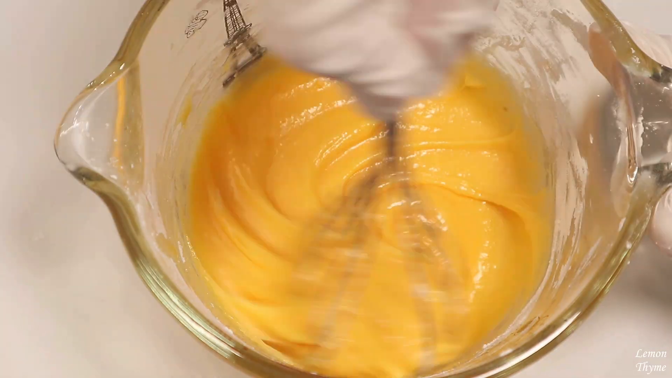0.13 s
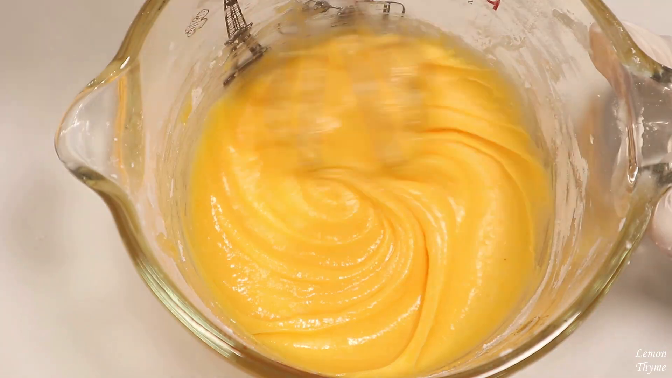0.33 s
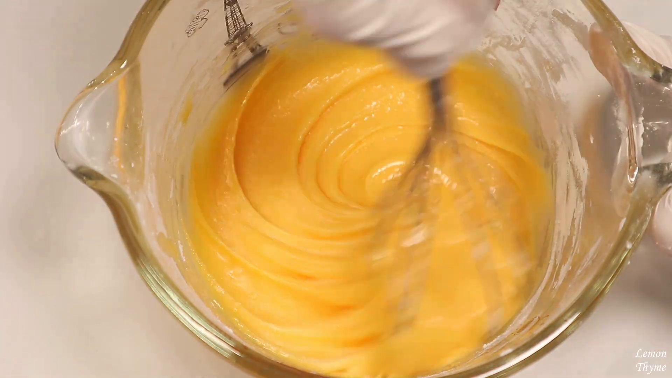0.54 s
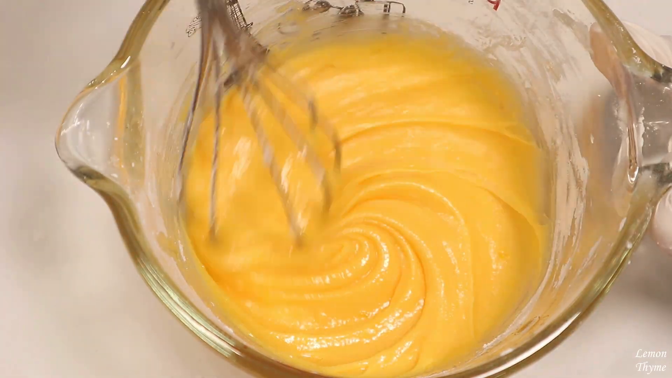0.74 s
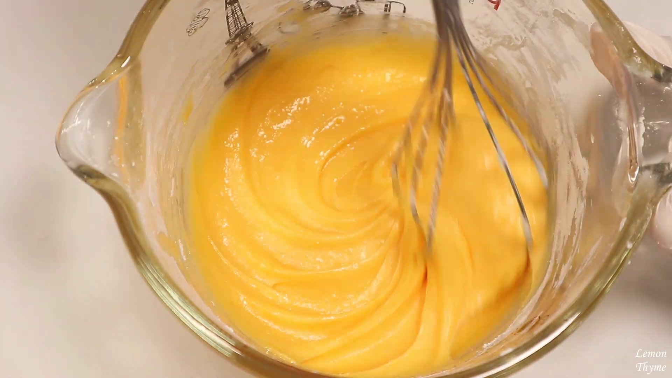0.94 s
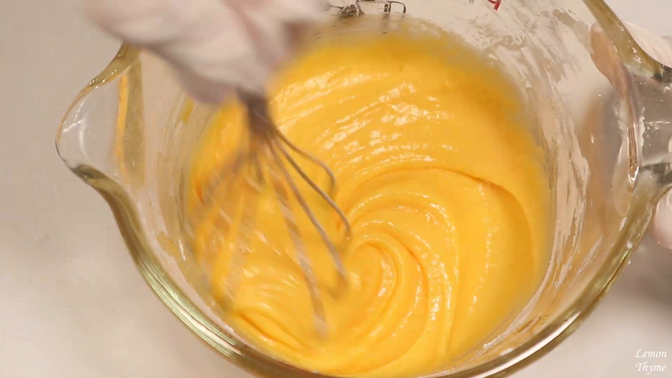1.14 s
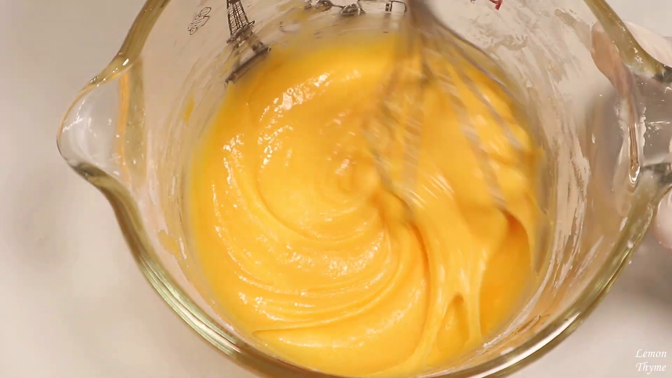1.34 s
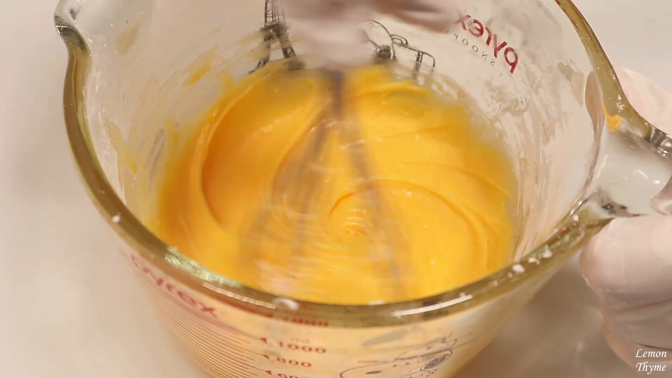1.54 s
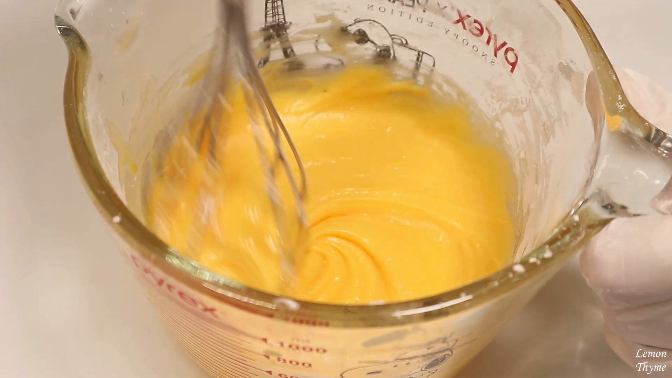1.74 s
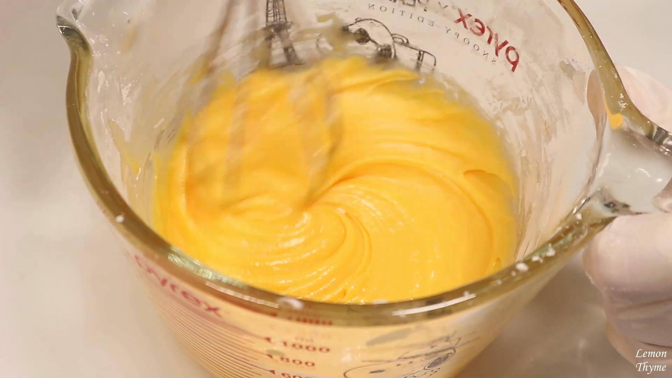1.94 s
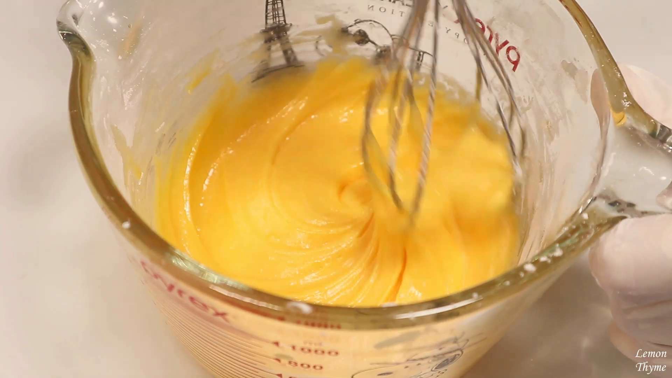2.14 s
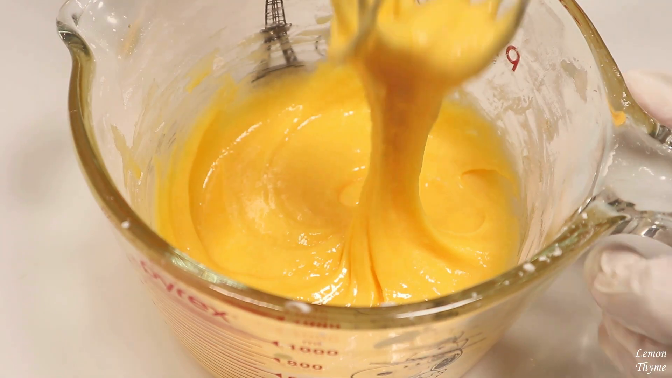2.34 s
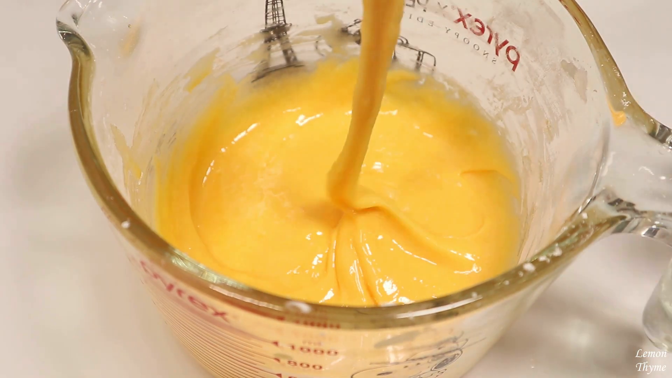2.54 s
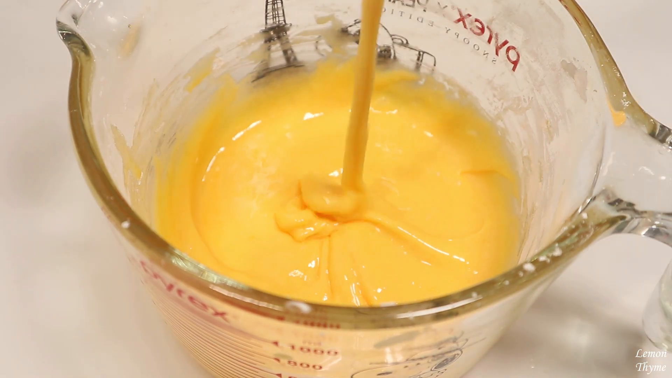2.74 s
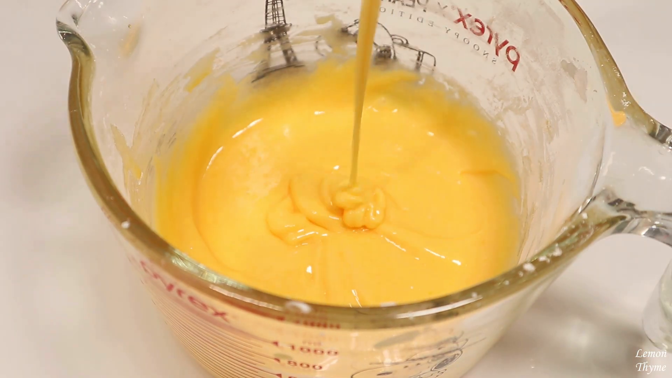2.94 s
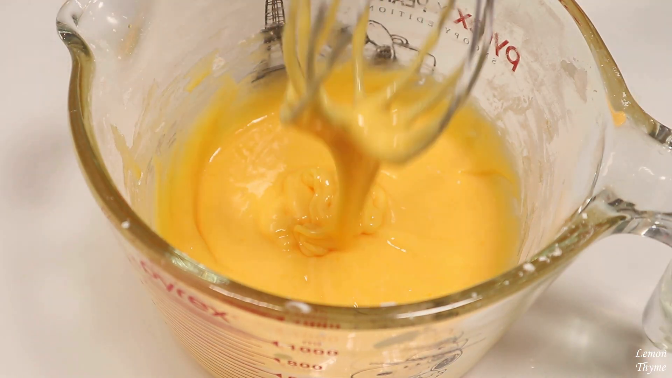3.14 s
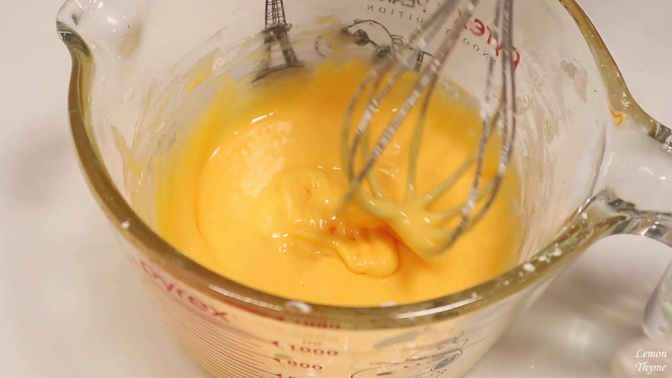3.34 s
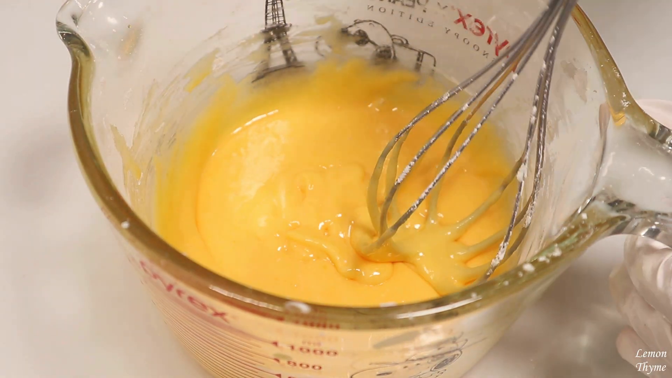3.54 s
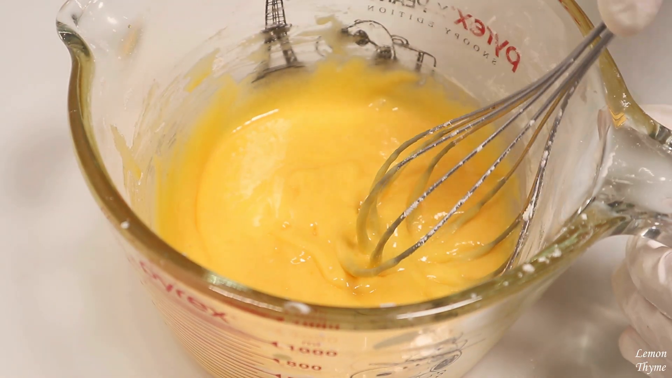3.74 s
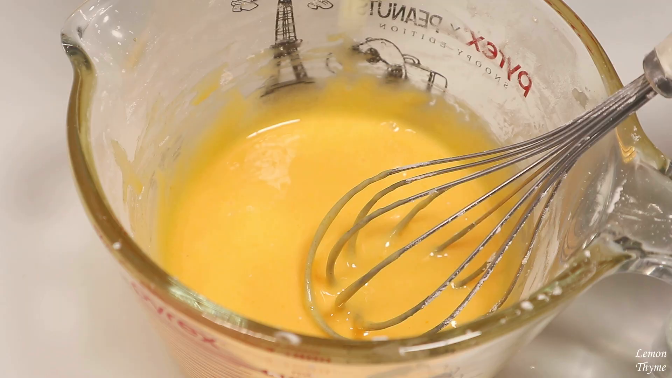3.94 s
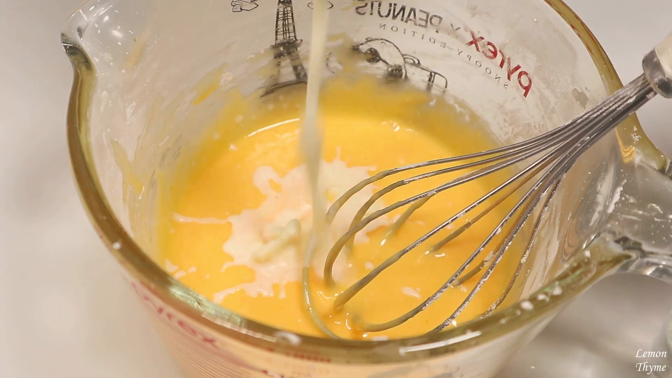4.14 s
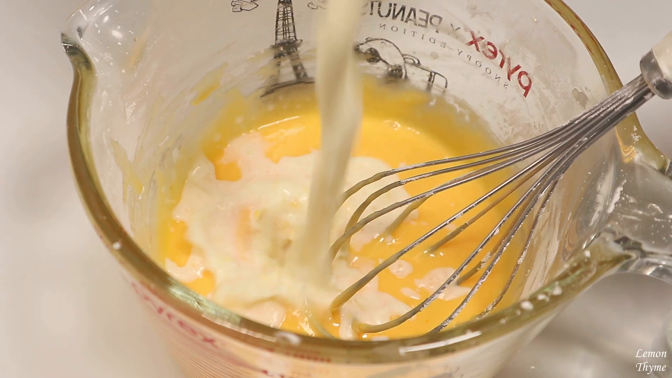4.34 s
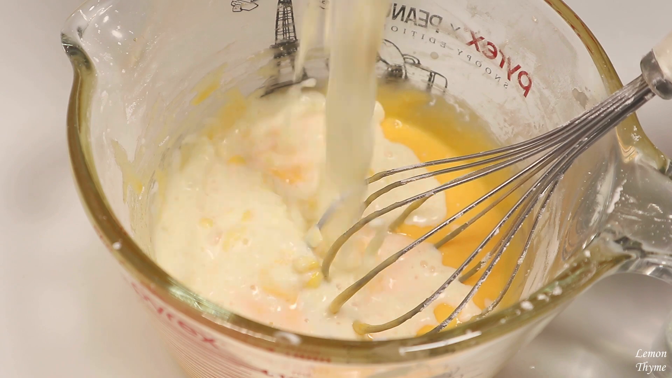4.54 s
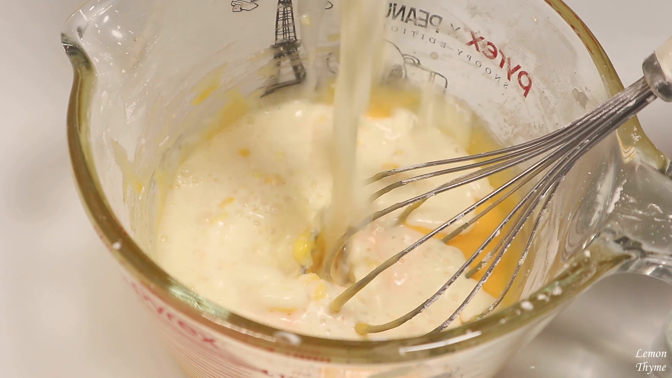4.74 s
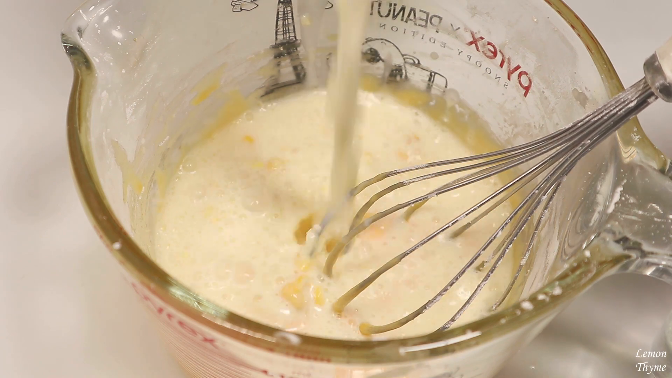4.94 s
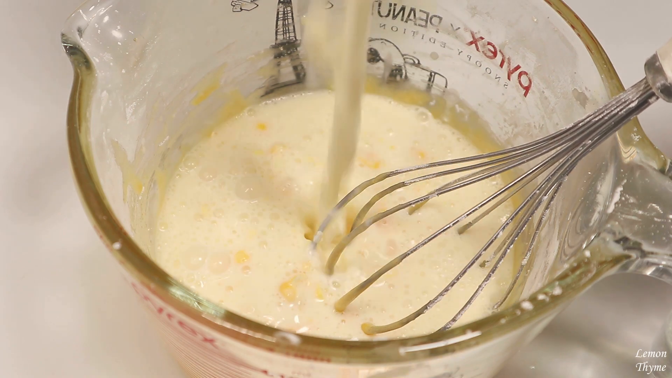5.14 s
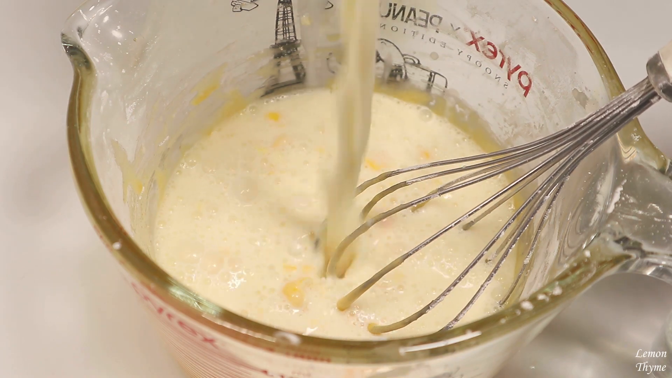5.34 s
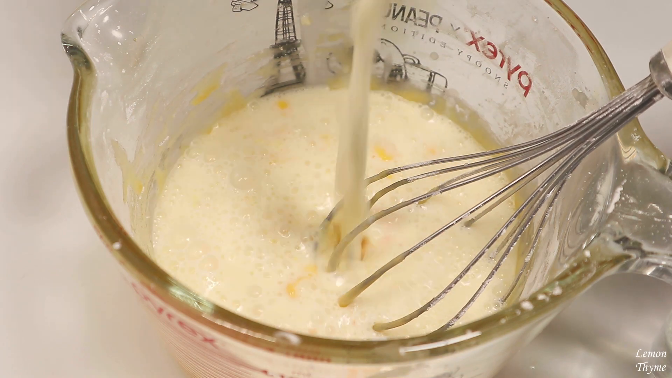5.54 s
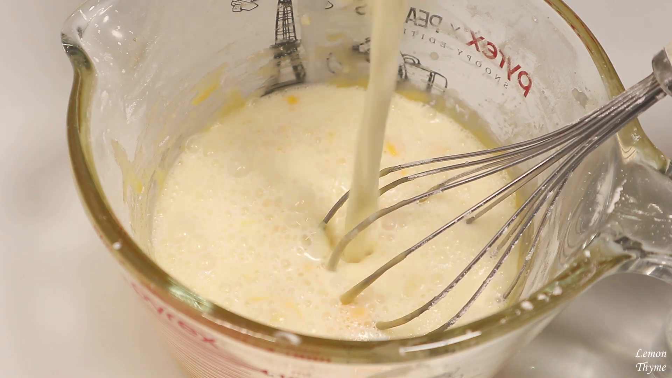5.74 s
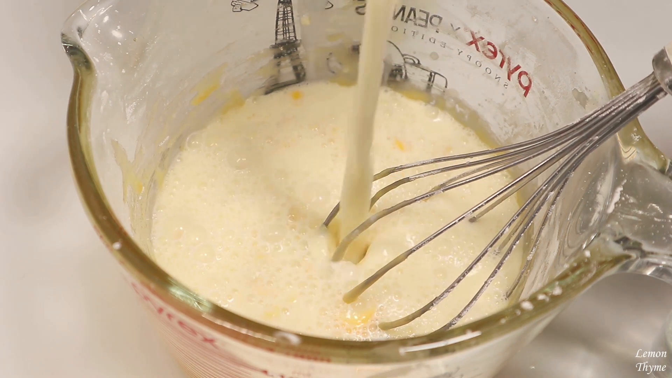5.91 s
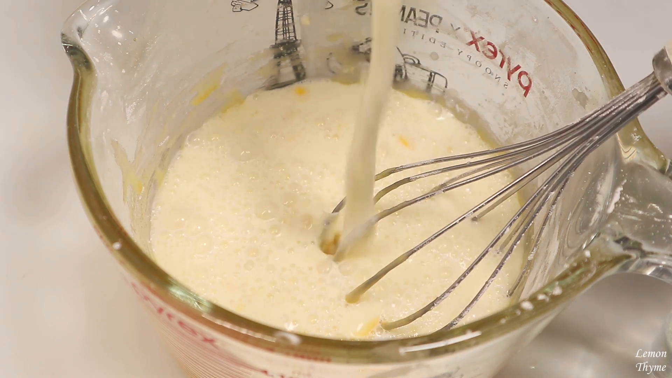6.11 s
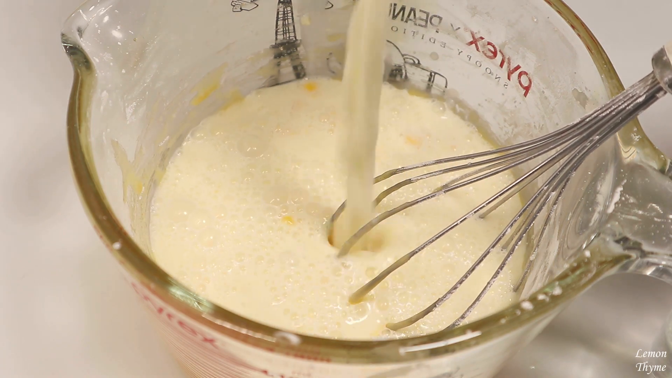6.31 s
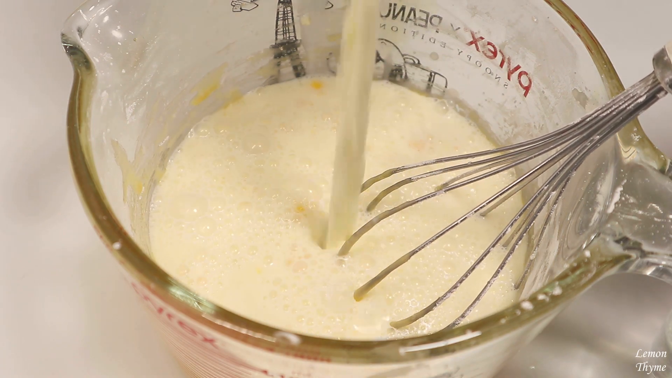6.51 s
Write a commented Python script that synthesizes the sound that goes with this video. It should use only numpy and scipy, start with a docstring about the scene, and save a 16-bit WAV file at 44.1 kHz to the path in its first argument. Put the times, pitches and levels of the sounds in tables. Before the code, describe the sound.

For two seconds thin wires scrape and rattle quickly on glass through sticky yolk, the jug bumping the counter. A tap or two, a tiny drip and faint wire touches fill a quiet gap. A stream of milk then bursts in, much louder, splattering and crackling brightly, with low hollow gulps, before foam mutes it. Close microphones, small dry kitchen.

```python
"""Whisking yolks, then pouring milk

A wire whisk beats thick egg yolks in a glass jug: wires scrape and tick on the glass, yolk squelches and
the jug thumps on the counter. The whisk is lifted with a clink, drips and is laid back. Milk is poured in:
plops, splats, gulping bubbles and a fizz that softens as foam builds. Close stereo, in a quiet kitchen.
Blows are shaped noise, glass and counter are decaying modes, the fizz is a swarm of tiny ringing bubbles."""
import sys
import numpy as np
from scipy import signal
from scipy.fft import rfft, irfft
from scipy.io import wavfile
from scipy.ndimage import uniform_filter1d

SR = 44100
rng = np.random.default_rng(int(sys.argv[2]) if len(sys.argv) > 2 else 0)


def dump(signal):
    """Clip the signal to [-1, 1] and save it as 16-bit WAV at the path in sys.argv[1]."""
    limited = np.clip(np.atleast_2d(signal).T, -1, 1)
    pcm = np.round(limited * 32767).astype(np.int16)
    wavfile.write(sys.argv[1], SR, pcm)


N = 294147
TIME = np.arange(N) / SR

# All event levels are relative: the functions trim them.
# Sweeps of the whisk along the wall. Each row: start in s, length in s, bite in dB, treble share in dB,
# push on the counter in dB.
STROKES = [(0.095, .01, -26.5, -11, -48), (0.138, 0.067, -24, -16.5, -29), (0.292, .04, -22, -14, -32.5),
           (0.354, 0.046, -32.5, -5.5, -43), (0.4676, 0.011, -17, -21, -37), (0.4997, 0.061, -25, -9, -50),
           (0.658, .01, -26.5, -8.5, -34.5), (0.6749, 0.0073, -23, 0, -42),
           (0.8315, 0.024, -26.5, -22, -35.5), (0.9068, .04, -26.5, -9, -29.5), (0.9742, .06, -31, -4, -34),
           (1.176, 0.053, -27, -14.5, -46), (1.361, 0.029, -30.5, -6, -40),
           (1.638, 0.033, -28.5, -20, -24.5), (1.7992, 0.029, -30, -11, -66),
           (1.9047, 0.0099, -26, -8, -23.5), (2.0208, .04, -25.5, -14, -42),
           (2.1253, 0.018, -21, -7.5, -21.5)]
# Ring of the jug's glass. Each row: frequency in Hz, level in dB, undamped t60 in s.
GLASS_MODES = [(1044, -14.5, 0.34), (1943, -4.5, 0.048), (3135, -2.5, 0.25), (4680, -1, 0.037),
               (4800, 4, 0.045), (5060, -24, 0.057), (6010, -1, 0.049), (8170, -8.5, .06),
               (8720, -4.5, 0.051), (9600, -19, .05), (12000, -5, 0.055)]
# The lifted whisk taps the free wall, which rings on. Each row: start in s, ring in dB, crack in dB.
CLINK_EVENTS = [(2.105, -49, -25), (2.418, -38, -25.5)]
# Soft drops landing on bare yolk. Each row: start in s, level in dB.
PLOP_EVENTS = [(2.838, -47), (4.126, -26.5), (4.148, -26), (4.175, -26), (4.279, -15), (4.349, -24)]
# Loudest slaps of milk. Each row: start in s, level in dB, low share in dB, treble share in dB.
LOUD_SLAPS = [(4.2393, -28, -12.5, 4), (4.2778, -11.5, -7, -6.5), (4.3458, -15, -22, -10),
              (4.35, -12.5, -33, -4), (4.436, -2.5, -22, -9.5), (4.47, -10, -7, -7),
              (4.5853, -7.5, -29, -20), (4.6004, -7.5, -20, -10), (4.689, -8, -25, -8),
              (4.7197, -13.5, -39, -3), (4.831, -10, -13.5, -20), (4.9016, -8.5, -11.5, -11),
              (4.9142, -13.5, -18, -30), (4.9574, -19.5, -3, -22), (5.069, -16.5, -15, -6),
              (5.1656, -6.5, -16.5, -2.5), (5.175, -13.5, -11, -20), (5.253, -16, -25, -14),
              (5.3817, -22.5, 0, -18), (5.5345, -20.5, -30, -6), (5.8112, -13, -29, 0.5),
              (5.876, -16.5, -10.5, -1), (5.9165, -25, -3, 3.5), (6.2882, -24.5, -9.5, -6),
              (6.373, -24, -10, -18), (6.451, -23.5, -4.5, -18), (6.4733, -17, -26, -29)]
# The stream of milk. Each row: time in s, fizz in dB, gurgle in dB.
POUR = [(4.2, -50.5, -52), (4.32, -35, -49.5), (4.46, -29.5, -35), (4.52, -33.5, -43), (4.588, -20.5, -36),
        (4.7, -33, -40), (5.0, -29, -40), (5.2, -29, -39), (5.47, -40.5, -41), (5.7, -35.5, -42.5),
        (5.95, -44.5, -42.5), (6.3, -41.5, -45.5), (6.46, -41, -36.5), (6.67, -45.5, -45.5)]

BEATING_ENDS_S = (2.146, 2.383)
FOAM_BUILDS_S = (4.22, 6.05)


def undb(db):
    """Decibels to gain."""
    return 10 ** (np.asarray(db) / 20)


def unit(x):
    """Scale to rms 1."""
    return x / np.sqrt(np.mean(x ** 2) + 1e-20)


def ramp(span_s, s=TIME):
    """Rise from 0 to 1 over a span of time."""
    return np.interp(s, span_s, [0, 1])


def curves(table):
    """Gain over time for each dB column of a table."""
    s, *columns = np.transpose(table)
    return [undb(np.interp(TIME, s, column)) for column in columns]


def add(track, s, sound):
    """Mix a sound into a track at a time."""
    start = max(int(s * SR), 0)
    track[start:start + len(sound)] += sound[:max(N - start, 0)]


def band(x, lo_hz, hi_hz):
    """Band-pass, its upper edge held below Nyquist."""
    sos = signal.butter(2, [lo_hz, min(hi_hz, .45 * SR)], "band", fs=SR, output="sos")
    return signal.sosfilt(sos, x)


def through(x, response):
    """Pass sound through a response scaled to unit energy."""
    return signal.oaconvolve(x, response / np.linalg.norm(response))[:len(x)]


def colour(x, spectrum, size=4096):
    """Minimum-phase filter through (Hz, dB) points, with unit energy."""
    hz, db = np.transpose(spectrum)
    log_hz = np.log(np.maximum(np.arange(size // 2 + 1) * SR / size, 1))
    log_gain = np.log(undb(np.interp(log_hz, np.log(hz), db)))
    cepstrum = irfft(log_gain)
    # folding the cepstrum makes the response causal
    cepstrum[1:size // 2] *= 2
    cepstrum[size // 2 + 1:] = 0
    return through(x, irfft(np.exp(rfft(cepstrum))))


def ring(modes, damping=1, uneven_db=0):
    """Half a second of decaying modes after one blow; the place of the blow makes their shares uneven."""
    t = TIME[:SR // 2]
    out = np.zeros(len(t))
    for (hz, db, t60_s), share in zip(modes, rng.standard_normal(len(modes))):
        decay = undb(db + uneven_db * share - 60 * damping * t / t60_s)
        out += decay * np.sin(2 * np.pi * hz * t)
    return out


def crackle(count, rate_per_s, spread_db):
    """Random clicks of uneven size and sign, rms 1."""
    chosen = rng.random(count) < rate_per_s / SR
    sizes = undb(spread_db * np.minimum(rng.exponential(size=count), 4))
    return unit(chosen * rng.choice([-1, 1], count) * sizes)


def burst(envelope, lo_hz, hi_hz):
    """Band noise under an envelope, with its loudest millisecond at rms 1."""
    x = band(rng.standard_normal(len(envelope)) * envelope, lo_hz, hi_hz)
    return x / np.sqrt(uniform_filter1d(x ** 2, SR // 1000).max())


def bubbles(rate_per_s, lo_hz, hi_hz, cycles, spread_db, count=28):
    """A swarm of small bubbles of many sizes, each ringing for a few cycles, rms 1."""
    out = np.zeros(N)
    for hz in np.geomspace(lo_hz, hi_hz, count):
        pole = np.exp((2j * np.pi - 1 / cycles) * hz / SR)
        rung = signal.lfilter([1], [1, -pole], crackle(N, rate_per_s / count, spread_db)).imag
        out += np.sqrt(hz) * unit(rung)
    return unit(out)


def whisk():
    """Wires bite, then stick and slip on the glass; the yolk squelches in the hollow of the jug."""
    # Each row: frequency in Hz, level in dB.
    wire_colour = [(500, -14), (900, -4), (1400, -16), (1900, -4), (2400, -5.5), (3200, -3), (4000, -14),
                   (4700, -4.5), (6000, -6.5), (12000, -9), (16000, -12.5)]
    # A lone wire ticks on the glass. Each row: start in s, level in dB.
    tick_events = [(0.0493, -33.5), (0.2648, -25), (0.4441, -28), (0.7664, -34), (1.1067, -31.5),
                   (1.325, -29), (1.5602, -27.5), (2.352, -45), (3.27, -42), (3.3213, -43), (3.7881, -45)]
    # The whisk is lifted out and slid back in. Each row: time in s, scrape in dB.
    handling_levels = [(2.28, -93), (2.38, -48), (2.55, -60.5), (2.75, -58), (3.1, -67), (3.3, -59),
                       (3.6, -53), (4.0, -71)]
    scrape_db, squelch_db, smack_db = -28.5, -25.5, -13  # relative to the bite
    stir_scrape_db, stir_squelch_db = -49.5, -51.5  # between sweeps
    tick_treble_db = -7
    lead_s = .005

    beating, effort, bites = 1 - ramp(BEATING_ENDS_S), drag(), contacts()
    handling = curves(handling_levels)[0] * (TIME < handling_levels[-1][0])
    scrape = undb(stir_scrape_db) * beating + undb(scrape_db) * effort + handling
    squelch = undb(stir_squelch_db) * beating + undb(squelch_db) * effort
    wires = undb(-4.0) * scrape * crackle(N, 1100, 3.0)
    yolk = undb(3) * squelch * crackle(N, 160, 4.5)
    glass = np.zeros(N)

    t = TIME[:SR // 12] - lead_s
    ticks = [(s, db, tick_treble_db) for s, db in tick_events]
    for s, db, treble_db in bites + ticks:
        envelope = np.exp(np.minimum(t / 0.0004, -t / 0.0037))
        slips = crackle(len(t), 4000, 1.3) * envelope
        slips *= undb(db - 9.0) * np.linalg.norm(envelope) / np.linalg.norm(slips)
        slips += (undb(treble_db + 12.5) - 1) * band(slips, 3200, 13100)
        add(wires, s - lead_s, slips)
        # a coated wire pressed on the wall shortens its ring
        wall = ring(GLASS_MODES, damping=1.6, uneven_db=7)
        add(glass, s - lead_s, signal.fftconvolve(slips, wall / np.linalg.norm(wall)))

    since = t + lead_s
    smack_envelope = (1 - np.exp(-since / 0.00031)) * np.exp(-t / 0.0068)
    for s, db, _ in bites:
        add(yolk, s, undb(db + smack_db) * burst(smack_envelope, 420, 1260))
    hollow = ring([(664, 7.0, 0.016), (720, -4.5, 0.0067), (352, 3, 0.011), (1008, -11, 0.039)])
    # small bubbles crackle in the froth wherever the wires are busy
    busy = np.sqrt(np.abs(uniform_filter1d(wires ** 2, size=700)))
    froth = busy * bubbles(420, 913, 4357, 6.2, 2.7, count=20)
    on_glass = undb(-4.5) * colour(wires, wire_colour) + undb(-7) * glass
    in_yolk = undb(-11.5) * froth + undb(-9.0) * through(yolk, hollow)
    return on_glass + in_yolk + contact_tones(bites)


def contacts():
    """Rows of (s, dB, treble dB): a leading wire starts each sweep, others trail at uneven gaps."""
    gap_s, gap_scatter = .023, .25  # median gap, log-normal scatter
    trailing_db, trailing_scatter_db = -2, 1.6  # relative to the leading wire
    rows = []
    for s, length_s, db, treble_db, _ in STROKES:
        gaps, sizes, tones = rng.standard_normal((8, 3)).T
        lags_s = np.cumsum(gap_s * np.exp(gap_scatter * gaps))
        levels_db = db + trailing_db + trailing_scatter_db * sizes
        trailing = np.c_[s + lags_s, levels_db, treble_db + 5 * tones]
        rows += [(s, db, treble_db), *trailing[lags_s < length_s]]
    return rows


def drag():
    """How hard the wires drag: each sweep swells, holds and dies away."""
    attack_s, release_s = .03, 0.0092
    out = np.zeros(N)
    for s, length_s, db, _, _ in STROKES:
        before = np.minimum(TIME - s, 0)
        after = np.maximum(TIME - s - length_s, 0)
        out += undb(db) * np.exp(before / attack_s - after / release_s)
    return out


def contact_tones(bites):
    """A short decaying tone of random pitch accompanies each wire contact."""
    level_db, median_hz, pitch_scatter, decay_cycles = -13, 2395, 0.296, 7.2
    out, t = np.zeros(N), TIME[:SR // 20]
    for s, db, _ in bites:
        pitch, size = rng.standard_normal(2)
        hz = median_hz * np.exp(pitch_scatter * pitch)
        tone = np.exp(-t * hz / decay_cycles) * np.sin(2 * np.pi * hz * t)
        add(out, s, undb(db + level_db + 2.8 * size) * tone)
    return out


def clinks():
    """Single taps crack on the glass and ring it; loose wires ping."""
    # Loose wires as the whisk is laid back. Each row: start in s, frequency in Hz, level in dB.
    ping_events = [(3.280, 2650, -63), (3.39, 4020, -64), (3.455, 4820, -54.5)]
    out, t = np.zeros(N), TIME[:SR // 2]
    for s, ring_db, crack_db in CLINK_EVENTS:
        crack = burst(np.exp(-t / 0.0016) + undb(-14) * np.exp(-t / 0.0071), 3340, 6500)
        add(out, s, undb(ring_db) * ring(GLASS_MODES) + undb(crack_db) * crack)
    for s, hz, db in ping_events:
        add(out, s, (1 - np.exp(-t / 0.018)) * ring([(hz, db, .4)]))
    return out


def splats(slap_rows):
    """Sharp wet double cracks, each inside a short swell of spray."""
    lead_s = .015
    attack_s, release_s, spray_db = .0025, .0068, -10
    spray_full_at_db, spray_loss = -22, 0.36  # harder slaps are drier: dB of spray lost per dB
    second_lag_s, second_db = .003, -10  # a slap breaks up in two; the lag is scattered
    out, t = np.zeros(N), TIME[:SR // 14] - lead_s

    def crack(lag_s):
        """Steep rise and fall around a lag."""
        return np.exp(np.minimum((t - lag_s) / 0.00015, (lag_s - t) / 0.00078))

    swell = np.exp(np.minimum(t / attack_s, -t / release_s))
    for s, db, low_db, treble_db in slap_rows:
        spray = undb(spray_db - spray_loss * max(db - spray_full_at_db, 0)) * swell
        second = undb(second_db) * crack(second_lag_s * rng.uniform(0.48, 2))
        envelope = crack(0) + second + spray
        body = burst(envelope, 3960, 6740)
        low = undb(low_db + 1.5) * burst(envelope + spray, 700, 2450)
        treble = undb(treble_db + 2.5) * burst(envelope, 7600, 14200)
        add(out, s - lead_s, undb(db - 3.5) * (body + low + treble))
    return out


def slaps(pockets):
    """Rows of (s, dB, low dB, treble dB): loud slaps, each gulp's snap, a chance patter of small ones."""
    snap_db = -7  # relative to the gulp
    small_per_s, small_db, small_low_db = 12, 14, -8.5  # level relative to the fizz
    open_treble_db, foam_treble_db = -9.5, 5.5  # treble share on open milk, its rise as foam builds
    small = [(s, db + snap_db, -8) for s, db, _ in pockets]
    for s, fizz_db, _, trait in scattered(small_per_s, spread_db=3):
        small.append((s, fizz_db + small_db, small_low_db + 5 * trait))
    rows = list(LOUD_SLAPS)
    for s, db, low_db in small:
        treble_db = open_treble_db + foam_treble_db * ramp(FOAM_BUILDS_S, s)
        rows.append((s, db, low_db, treble_db + 4 * rng.standard_normal()))
    return rows


def scattered(per_s, spread_db):
    """Chance events during the pour: rows of (s, fizz dB, gurgle dB, a random trait), levels scattered."""
    s, fizz_db, gurgle_db = np.transpose(POUR)
    place, size, trait = rng.standard_normal((80, 3)).T
    times = s[1] + (np.arange(len(place)) + .3 * place) / per_s
    scatter_db = spread_db * size
    fizz = np.interp(times, s, fizz_db) + scatter_db
    gurgle = np.interp(times, s, gurgle_db) + scatter_db
    return np.c_[times, fizz, gurgle, trait][times < s[-1]]


def stream():
    """Small bubbles fizz and middling ones gurgle; growing foam dulls the fizz."""
    # Fizz on open milk, fizz under foam, gurgle. Each row: frequency in Hz, level in dB.
    fresh_colour = [(900, -21), (1500, -10.5), (2500, -16), (3300, -7), (4900, 0), (6400, -6), (9000, -7.5),
                    (12000, -9.5), (16000, -16)]
    foam_colour = [(900, -19), (1500, -17), (2200, -12.5), (2750, -13), (3250, 8.5), (3650, 1), (4100, 6),
                   (4700, -3), (5500, -1), (7100, 1), (9500, -12), (11700, -3), (16000, -21)]
    gurgle_colour = [(150, -51), (250, 5), (307, -5.5), (356, -11), (468, -19), (569, 1), (720, 3.5),
                     (1080, -11.5), (1880, -7.5), (2160, -28), (2600, -10.5), (3380, -30), (5720, -120)]
    fizz, gurgle = curves(POUR)
    flowing, foam = ramp((4.13, 4.22)), ramp(FOAM_BUILDS_S)
    small = bubbles(5000, 1600, 15500, 7.0, 5.5) + undb(-6.5) * crackle(N, 1400, 18.0)
    fresh = unit(colour(small, fresh_colour))
    foamy = unit(colour(small, foam_colour))
    small = (1 - foam) * fresh + foam * foamy
    middling = unit(colour(bubbles(700, 258.6, 2700, 2.3, 4.3), gurgle_colour))
    return flowing * (undb(-0.5) * fizz * small + undb(-2.0) * gurgle * middling)


def gulps(pockets):
    """Bubbles ring for a few cycles, each in its own way, most rising in pitch as they surface."""
    out, t = np.zeros(N), TIME[:SR // 10]
    for s, db, hz in pockets:
        life, rise = rng.standard_normal(2)
        envelope = (1 - np.exp(-t / 0.0009)) * np.exp(-t / (0.0037 * np.exp(0.11 * life)))
        phase = 2 * np.pi * hz * t * (0.975 + (3 + 4 * rise) * t)
        add(out, s, undb(db + 5.5) * envelope * np.sin(phase))
    # the hollow of the jug radiates little below its own resonance
    return band(out, 496, 6000)


def air_pockets():
    """Rows of (s, dB, nominal Hz): the large gulps and a chance string of smaller ones."""
    # Largest pockets pulled under by the stream. Each row: start in s, level in dB, nominal pitch in Hz.
    large = [(4.401, -23, 704), (4.633, -21.5, 770), (4.736, -20, 698), (4.776, -23, 723),
             (4.9576, -24, 1440), (5.075, -22, 705), (5.115, -23, 910), (5.175, -13.5, 698),
             (5.224, -21.5, 640), (5.294, -23.5, 677), (5.3804, -26, 1940), (5.382, -22.5, 680),
             (5.492, -22.5, 684), (5.693, -21.5, 644), (5.738, -23.5, 660), (6.377, -22.5, 685),
             (6.425, -22, 650), (6.432, -28, 2240), (6.45, -18.5, 637)]
    small_per_s, small_db = 22, 7.5  # level relative to the gurgle
    median_hz, pitch_scatter = 711, .16
    rows = list(large)
    for s, _, gurgle_db, trait in scattered(small_per_s, spread_db=3):
        rows.append((s, gurgle_db + small_db, median_hz * np.exp(pitch_scatter * trait)))
    return rows


def plops():
    """Drops land on thick yolk with a wet tick and a hollow knock; the stream drums until milk covers it."""
    # Each row: frequency in Hz, level in dB, t60 in s.
    knock_modes = [(410, 0.5, 0.056), (493, -2.5, 0.026), (710, 0.5, 0.023), (1070, -4, 0.027),
                   (1760, -2, 0.026), (2560, -12, 0.0069)]
    out, t = np.zeros(N), TIME[:SR // 2]
    for s, db in PLOP_EVENTS:
        tick = burst(np.exp(-t / 0.004), 1700, 16460)
        add(out, s, undb(db - 10.5) * (ring(knock_modes, uneven_db=5) + undb(-4.5) * tick))
    bare_db = np.interp(TIME, [4.12, 4.3, 4.5, 5.1], [-59, -48, -46, -70.5])
    bare = undb(bare_db) * (TIME > 4.12)
    return out + bare * unit(band(crackle(N, 300, 1.4), 350, 430))


def counter(pockets):
    """Blows on the jug swell into the counter's low modes; hand and stream keep it swaying and drumming."""
    # Upper, lower and rocking modes. Each row: frequency in Hz, level in dB, t60 in s.
    upper_modes = [(166.6, 1, 0.2), (128.5, 2.5, 0.099), (204, -17, 0.047)]
    lower_modes = [(85, 4.5, .2), (62, -10, 0.45)]
    rock_modes = [(27.9, -7.5, 0.78)]
    # Each row: frequency in Hz, level in dB.
    drum_colour = [(30, -16.5), (65, 3.5), (110, 0.5), (160, 7), (200, -9), (270, -26), (400, -44),
                   (700, -47.5)]
    # How hard each sound pushes the jug on the counter, in dB, by kind.
    share_db = {"clink": -9, "plop": -8, "splat": -22, "gulp": -8}
    lag_s = 0.0051
    # past a firm push only the lower modes grow, in dB per dB
    firm_db, lower_at_firm_db, lower_growth = -30, -31.5, 1.71
    hand_sway_db, hand_drum_db = -38, -47.5  # shaken by the beating hand
    stream_sway_db, stream_drum_db = -37.5, -38  # and by the falling milk
    fill_push_db = 5  # the fuller jug passes gulps on more strongly

    out = np.zeros(N)
    swell = 1 - np.exp(-(TIME[:SR // 2] / 0.0087) ** 2)
    upper, lower = swell * ring(upper_modes), swell * ring(lower_modes + rock_modes)
    pushes = [(s, db) for s, *_, db in STROKES]
    pushes += [(s, db + share_db["clink"]) for s, _, db in CLINK_EVENTS]
    pushes += [(s, min(db + share_db["plop"], firm_db)) for s, db in PLOP_EVENTS]
    for s, db in pushes:
        lower_db = lower_at_firm_db + lower_growth * (db - firm_db)
        add(out, s + lag_s, undb(min(db, firm_db) + 4.0) * upper + undb(lower_db) * lower)
    for s, db, *_ in LOUD_SLAPS:
        add(out, s + lag_s, undb(db + share_db["splat"]) * lower)
    for s, db, _ in pockets:
        push_db = db + share_db["gulp"] + fill_push_db * ramp((5.2, 6.2), s)
        add(out, s + lag_s, undb(push_db) * upper)

    hand, flow, foam = 1 - ramp(BEATING_ENDS_S), ramp((4.1, 4.32)), ramp(FOAM_BUILDS_S)
    # foam cushions the stream
    sway = undb(hand_sway_db) * hand + undb(stream_sway_db - 16 * foam) * flow
    drum = undb(hand_drum_db) * hand + undb(stream_drum_db - 2.8 * foam) * flow
    swaying = sway * unit(band(rng.standard_normal((2, N)), 24.4, 30.5))
    drumming, side_drumming = (drum * unit(colour(rng.standard_normal(N), drum_colour)) for _ in range(2))
    mid = out + undb(-1.3) * drumming
    # the upper modes also rock the microphone sideways
    side = undb(-3.5) * band(mid, 149, 260) + undb(-9) * side_drumming
    stereo_side = side * np.array([[1], [-1]]) * undb(-2.5)
    return mid * undb([[1.3], [-1.3]]) + stereo_side + swaying * undb([[0.5], [-5]])


def space(x, right_db, early_db, room_db, turn_hz=3.3):
    """Jug wall echoes shift as the source moves, the kitchen rings briefly; the right microphone is nearer."""
    t = TIME[:SR // 3]
    turn = 2 * np.pi * turn_hz * TIME
    left = np.r_[0, x[:-1]] * undb(-right_db / 2)
    right = x * undb(right_db / 2)
    out = []
    for direct in (left, right):
        walls = band(rng.standard_normal((2, len(t))), 3730, 20100) * np.exp(-t / 0.002)
        early = np.cos(turn) * through(x, walls[0]) + np.sin(turn) * through(x, walls[1])
        room = band(rng.standard_normal(len(t)), 133, 20000) * undb(-60 * t / 0.17) * (t > .005)
        out.append(direct + undb(early_db) * early + undb(room_db) * through(x, room))
    return np.array(out)


def kitchen():
    """Faint room rumble and hiss, mostly unrelated left and right."""
    # Each row: frequency in Hz, level in dB.
    room_colour = [(12, -5), (20, -0.5), (65, 2.5), (150, -6), (446, -21), (738, -23), (873, -29),
                   (1610, -26.5), (1760, -29), (2140, -31.5), (12400, -31.5), (14700, -34), (16000, -41)]
    shared, left, right = (unit(colour(rng.standard_normal(N), room_colour)) for _ in range(3))
    return undb(-54) * (0.33 * shared + np.array([left, right]))


def scene():
    """Whisking, then pouring, over the counter and the quiet room."""
    # Air resonances above the milk. Each row: frequency in Hz, level in dB, t60 in s.
    jug_air = [(3410, 8, 0.012), (4036, 9, 0.0069), (5160, 8.5, 0.0023), (7900, -27, 0.029)]
    # The level dips briefly. Each row: centre in s, length in s.
    dip_events = [(1.528, 0.024), (3.969, 0.025)]
    pockets = air_pockets()
    slap_rows = slaps(pockets)
    milk = splats(slap_rows) + stream()
    milk = undb(-3.0) * milk + undb(-15.5) * through(milk, ring(jug_air))
    whisking = space(whisk() + clinks(), right_db=5.0, early_db=-4.0, room_db=-9)
    pouring = space(milk, right_db=3.0, early_db=-5.5, room_db=-12.5, turn_hz=7)
    # spray flies to all sides of the jug, so its treble differs between the microphones
    spray = undb(-8.5) * band(splats(slap_rows), 7900, 11600) * np.array([[1], [-1]])
    glugging = space(gulps(pockets) + plops(), right_db=5.5, early_db=-0.5, room_db=-13.0)
    sound = whisking + pouring + spray + glugging + counter(pockets) + kitchen()
    dip = sum(abs(TIME - s) < length_s / 2 for s, length_s in dip_events)
    return sound * undb(-25 * uniform_filter1d(dip * 1., size=200))


def record(dry):
    """Clip at full scale, then cut the top above 16 kHz."""
    top_cut = signal.ellip(8, .2, 70, 16000, fs=SR, output="sos")
    return signal.sosfilt(top_cut, np.clip(dry, -1, 1))


dry = scene()
out = record(dry)
dump(out)
```